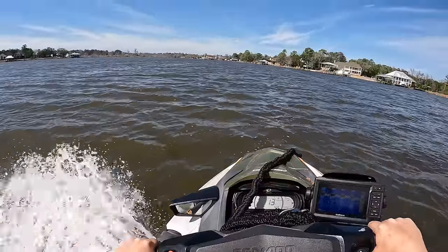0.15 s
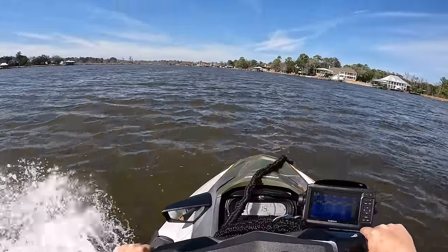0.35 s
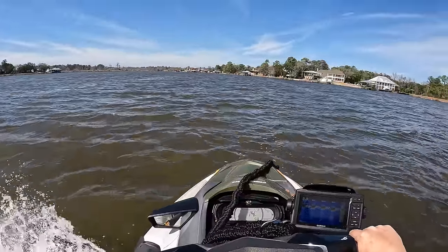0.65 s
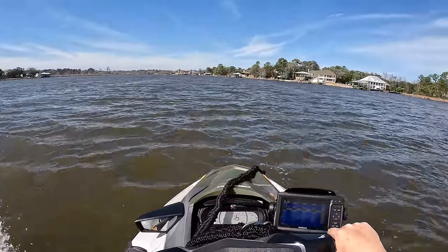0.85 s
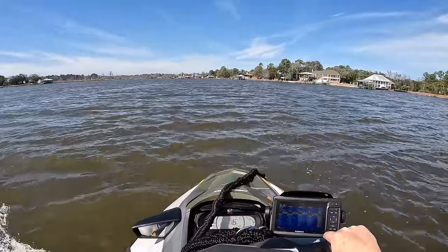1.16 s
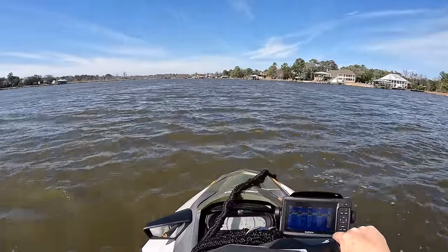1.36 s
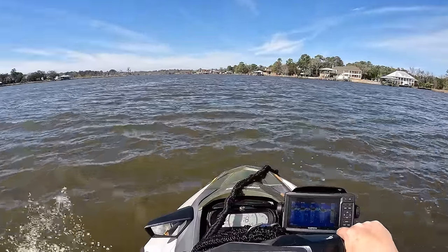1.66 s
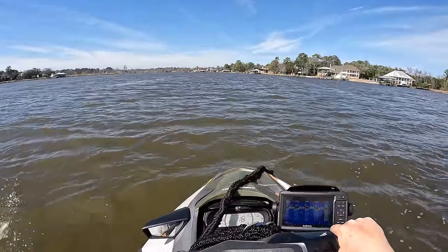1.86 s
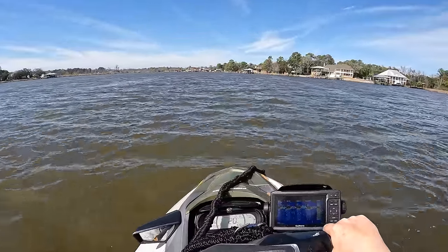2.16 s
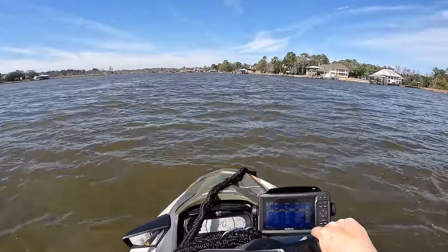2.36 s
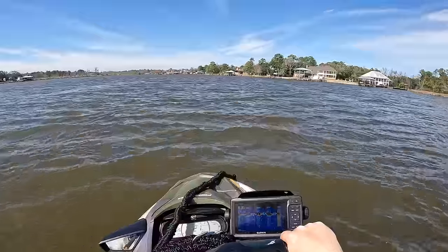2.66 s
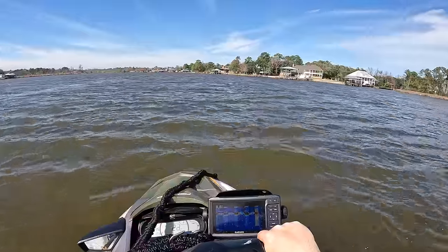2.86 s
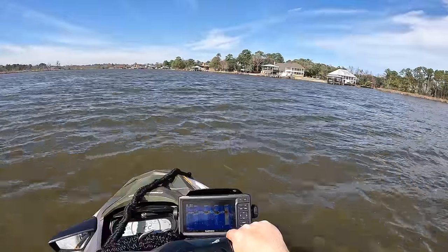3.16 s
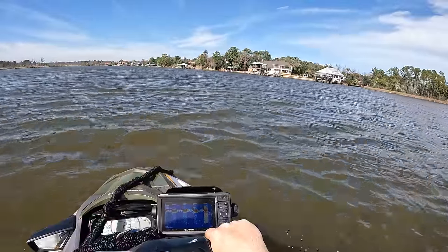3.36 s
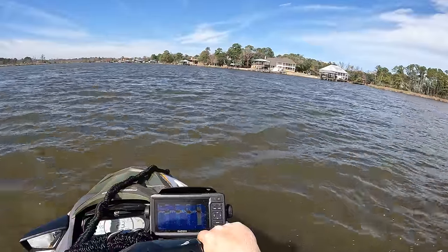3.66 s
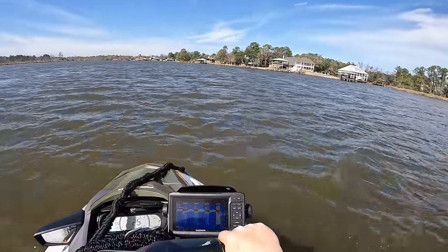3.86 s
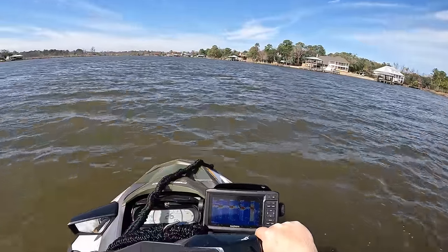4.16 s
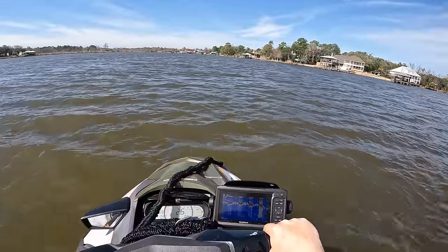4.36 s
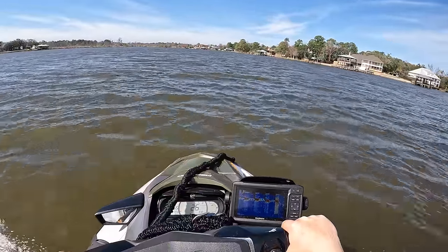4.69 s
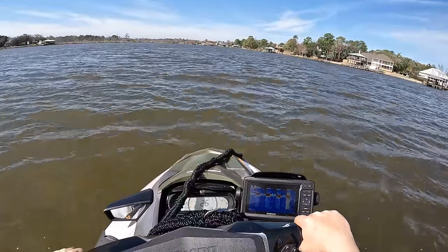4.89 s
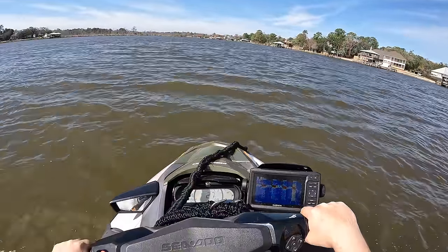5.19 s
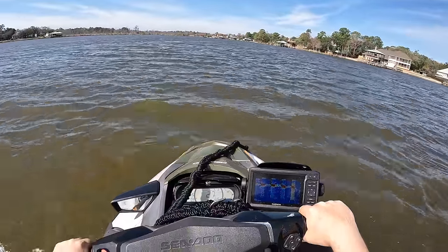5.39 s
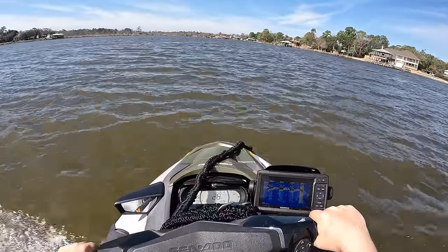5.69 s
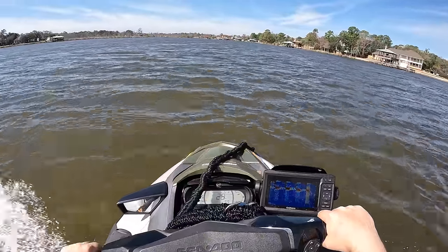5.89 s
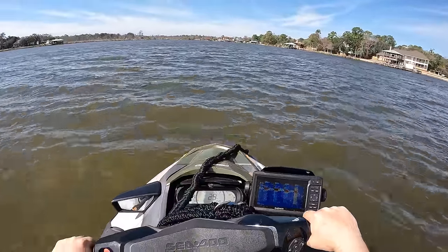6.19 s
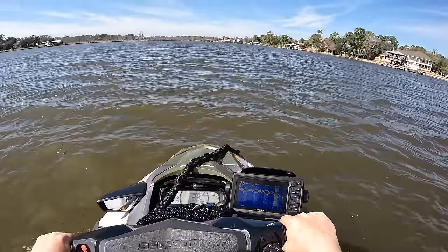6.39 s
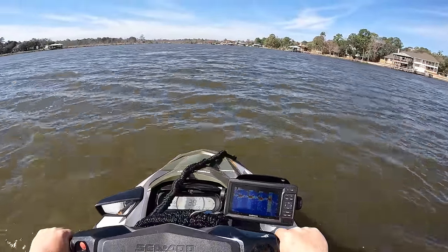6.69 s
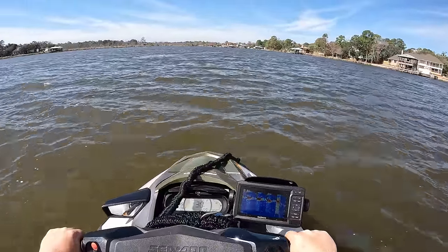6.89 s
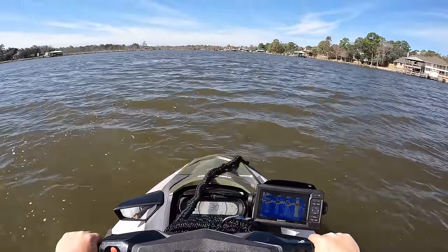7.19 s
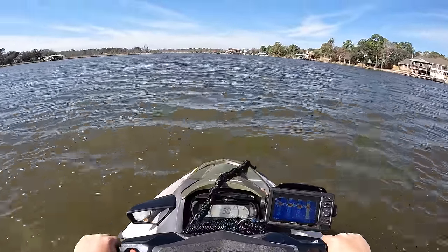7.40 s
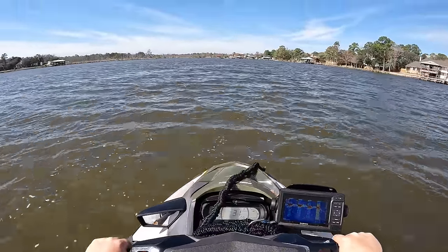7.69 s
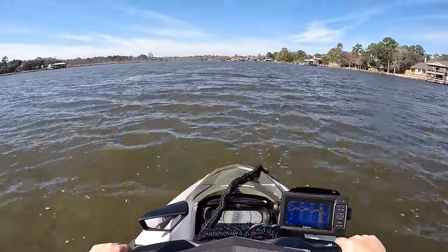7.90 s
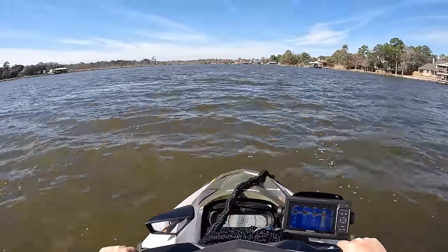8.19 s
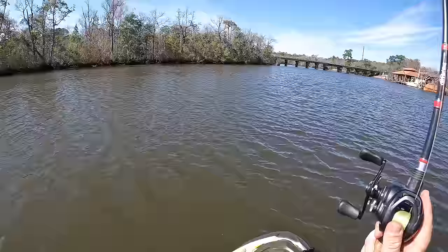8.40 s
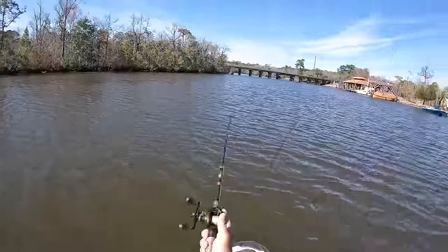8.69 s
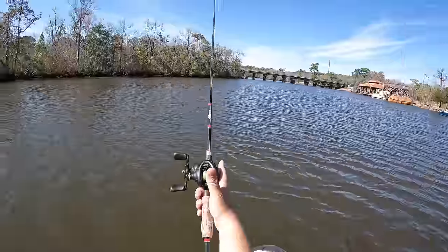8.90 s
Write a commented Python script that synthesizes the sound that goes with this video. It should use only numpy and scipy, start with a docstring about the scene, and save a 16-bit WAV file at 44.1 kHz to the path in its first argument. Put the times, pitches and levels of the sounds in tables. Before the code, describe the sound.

Steady watercraft engine drone with spray, hull slaps and wind rumble, cutting abruptly to a quiet breeze and a brief rod swing.

```python
"""Watercraft on a lake

A three-cylinder four-stroke watercraft cruises, heard from the rider's chest. The engine hums through
the hull, small waves drum on it and wind buffets. Spray hisses, then fades as the craft rises to skim
the water. A sudden cut leads to the craft adrift: a breeze, a rustling sleeve, soft bumps and a
fishing rod swung up."""
import sys
import numpy as np
from scipy import signal
from scipy.fft import rfft, irfft, next_fast_len
from scipy.io import wavfile
from scipy.ndimage import uniform_filter1d

SR = 44100
rng = np.random.default_rng(int(sys.argv[2]) if len(sys.argv) > 2 else 0)


def dump_mix(stems):
    """Bounce the given channels to the path in sys.argv[1] as a 16-bit WAV at rate SR."""
    frames = np.atleast_2d(stems).T  # one column per channel
    limited = np.clip(frames, -1, 1)  # hard clip at full scale
    pcm = np.round(limited * 32767).astype(np.int16)
    wavfile.write(sys.argv[1], SR, pcm)


N = 399100
T = np.arange(N) / SR
CUT_S = 8.4528  # riding ends, drifting begins


def undb(db):
    """Turns decibels into a number to multiply a sound by."""
    return 10 ** (np.asarray(db) / 20)


def curves(table):
    """Joins a table's rows with straight lines: one curve for each column after the time."""
    times, *columns = np.transpose(table)
    return [np.interp(T, times, column) for column in columns]


def wander(rate_hz):
    """A smooth random curve, typically within 1 of zero, with rate_hz new values a second."""
    steps = np.repeat(rng.standard_normal(int(T[-1] * rate_hz) + 2), 16)
    smooth = uniform_filter1d(uniform_filter1d(steps, size=16), size=16)
    return 1.2 * np.interp(T * rate_hz, np.arange(len(steps)) / 16, smooth)


def rush(tone, level_db, flicker_db, rate_hz, grain_db=0):
    """Flickering noise, shaped from bass to treble by a tone table; grain_db adds tiny crackles."""
    noise = rng.standard_normal(N) * undb(grain_db * rng.exponential(size=N))
    size = next_fast_len(N)
    tone_hz, tone_db = np.transpose(tone)
    hz = np.arange(size // 2 + 1) * SR / size + 1
    gains = undb(np.interp(np.log(hz), np.log(tone_hz), tone_db, -99, -99))
    shaped = irfft(rfft(noise, size) * gains, size)[:N]
    shaped /= np.sqrt(np.mean(shaped ** 2))
    return shaped * undb(level_db + flicker_db * wander(rate_hz))


def ploughing(start_s=0.99, end_s=2.96):
    """1 while the hull pushes through the water, easing to 0 as it climbs up and skims."""
    progress = np.clip((T - start_s) / (end_s - start_s), 0, 1)
    return np.cos(np.pi / 2 * progress) ** 2


# Engine speed, where one cycle is two turns of the crank: time_s, cycle_hz
ENGINE_SPEED = [(0, 51.49), (1.4, 51.99), (2.8, 52.83), (3.5, 52.88), (4.7, 53.18), (6.3, 53.35),
                (6.95, 54.02), (8.45, 54.19)]
# Level of the hum's main tone: slow swells, with brief dips as it mixes with water noise:
# time_s, change_db
MAIN_TONE_LEVEL = [(0, 1), (.4, 2.5), (1.2, 4), (1.8, 3), (2.6, -3.5), (3.2, 1), (3.86, 3.5), (4.6, 0),
                   (5.2, -0.5), (5.6, -2.5), (5.95, 0), (6.33, -2.5), (6.8, 4), (7.3, 3), (7.38, -4),
                   (7.46, 2), (7.8, 3.5), (8.1, 0), (8.45, 1)]
# Loud tones of the hum: cycle_multiple, level_db, ploughing_adds_db, change_share, db_per_hz_over_cruise
STRONG_TONES = [(2, -29, 7, -1.1, 0.5), (3, -21, 0.2, 0.98, -0.4), (4, -27, 1, .1, -2.5),
                (6, -20, -6, 0.081, -2.5), (8, -22, -2.5, 0.21, -0.27), (9, -34, -0.5, .8, -4.5),
                (11, -41, 0, 0.54, -6), (15, -45.5, 2, 0.49, -.6), (16, -52, 16.5, .3, 6),
                (20, -53, 3, -0.16, 7.5)]
# Faint tones of the hum: cycle_multiple, level_db, ploughing_adds_db
FAINT_TONES = [(5, -37.5, 2), (7, -43, 8.5), (10, -48.5, -5), (12, -55.5, 18), (13, -58, 2),
               (14, -58.5, 10), (17, -54.5, 12), (18, -54.5, 3), (19, -58.5, 9), (21, -54.5, 7),
               (22, -55, 3), (24, -59, 7.5)]

def engine(cruise_hz=52.8, firings_per_cycle=3):
    """Tones at multiples of the engine cycle waver as the hull flexes. Returns hum and cycle angle."""
    cycle_hz, change_db = curves(ENGINE_SPEED) + curves(MAIN_TONE_LEVEL)
    plough = ploughing()
    over_hz = np.maximum(cycle_hz - cruise_hz, 0)
    tones = [(multiple, db + plough_db * plough + share * change_db + db_per_hz * over_hz)
             for multiple, db, plough_db, share, db_per_hz in STRONG_TONES]
    tones += [(multiple, db + plough_db * plough) for multiple, db, plough_db in FAINT_TONES]
    cycles = np.cumsum(cycle_hz) / SR
    phase = 2 * np.pi * (cycles - cycles[int(CUT_S * SR)]) - .14  # pressure is low at the cut
    hum = np.zeros(N)
    for multiple, db in tones:
        firing = multiple == firings_per_cycle
        # a lopsided suction pulse: odd tones above the firing note swing against it
        offset = .9 + .75 * np.pi * (multiple > firings_per_cycle and multiple % 2)
        # uneven speed blurs high tones more; the firing note gurgles in the wet exhaust
        blur = (.02 * multiple + .12 * firing) * wander(14)
        waver_db = (1 + 1.1 * firing) * wander(7)
        hum -= np.sqrt(2) * undb(db + waver_db) * np.cos(multiple * phase + offset + blur)
    return undb(-.05) * hum, phase


# Tone of water hitting the hull: pitch_hz, level_db
CHOP_TONE = [(70, -19), (110, -3), (150, -0.5), (190, 1.5), (250, -2), (320, -3.5), (385, -5), (440, -5),
             (500, -7.5), (600, -24), (900, -47)]

def chop(level_db):
    """Small choppy waves drum on the hull."""
    return rush(CHOP_TONE, level_db, flicker_db=1.27, rate_hz=12)


# Tone of the churned water behind the craft: pitch_hz, level_db
WAKE_TONE = [(350, -16), (560, -2), (800, -2.5), (1100, -6.5), (1500, -12.5), (2200, -20.5), (4000, -38)]

def wake(phase, added_db):
    """Churned water throbs with the engine cycle, louder while the hull ploughs."""
    throb = 1 + .096 * np.cos(phase) + .07 * np.cos(2 * phase)
    level_db = -34.5 + 6 * ploughing() + added_db
    return throb * rush(WAKE_TONE, level_db, flicker_db=1, rate_hz=15)


# Tone of flying droplets: pitch_hz, level_db
SPRAY_TONE = [(1000, -29.5), (1500, -3), (2200, -3), (3100, -3.5), (5000, -10), (7300, -15.5),
              (8600, -20.5), (10500, -29), (12000, -34.5), (14000, -51.5), (16000, -58.5)]

def spray(level_db):
    """Thrown water hisses, with single droplets standing out."""
    return rush(SPRAY_TONE, level_db, flicker_db=.9, rate_hz=32, grain_db=2)


# Tone of the finest spray: pitch_hz, level_db
MIST_TONE = [(8000, -16), (10000, -2), (11100, -4), (13100, 2), (14000, -2), (15800, -4)]

def mist(fade_start_s=1.45, settle_s=.7, drop_db=35.5):
    """Fine mist gives a very high hiss that dies away as the hull rises."""
    faded = 1 - np.exp(-np.maximum(T - fade_start_s, 0) / settle_s)
    return rush(MIST_TONE, -56.5 - drop_db * faded, flicker_db=.6, rate_hz=25)


# Tone of the headwind: pitch_hz, level_db
WIND_TONE = [(15, -7), (40, -4), (80, -6), (130, -12), (300, -36.5)]

def wind(level_db):
    """Gusts buffet the microphone with a deep rumble."""
    return rush(WIND_TONE, level_db, flicker_db=3, rate_hz=8.3)


# Waves that meet the hull: peak_s, spray_adds_db, wake_adds_db, chop_adds_db, build_up_s
HULL_WAVES = [(.63, 2, 1, -0.5, .15), (1.05, 1, -0.5, 1, 0.073), (1.42, 0, 0, 0.5, 0.088),
              (1.84, 2.5, 1.5, 0.5, 0.15), (2.35, 1.5, 0, 1.5, 0.067), (2.97, 2, -1, 4.5, 0.11),
              (3.14, -1, -1.5, 7.5, .06), (3.56, 2, 1.5, -1, 0.072), (3.93, 1.2, 4, 1.5, 0.24),
              (4.12, 1.5, 3, 0, 0.14), (4.72, 0, 1, 3.5, 0.092), (5.13, 0, -1.5, 6, 0.053),
              (5.7, 0, 2.5, 2, 0.088), (6.27, 0.5, 3, 3, 0.14), (6.8, -0.5, 2, -1, 0.056),
              (7.42, 1.5, 0.5, 6, 0.066), (7.75, 0.5, 2.5, 1, 0.12), (8.24, 1.5, 2, -3, 0.057)]

def waves(break_s=.05):
    """Each wave builds up, then breaks off. Returns the decibels added to spray, wake and chop."""
    peak_s, *added_db, build_up_s = np.transpose(HULL_WAVES)[:, :, None]
    width_s = np.where(T < peak_s, build_up_s, break_s)
    shape = np.exp(-((T - peak_s) / width_s) ** 2)
    return [np.sum(db * shape, axis=0) for db in added_db]


# Loudness of air and water during the ride: time_s, wind_db, chop_db, spray_db
RIDE_LEVELS = [(0, -27.5, -23, -38), (.6, -23, -23, -37.5), (1.0, -31.5, -21.5, -38),
               (1.5, -29.5, -20, -39), (2.25, -30, -23.5, -39.5), (2.75, -27.5, -24, -40.5),
               (3.3, -35, -26, -42), (3.7, -26, -23.5, -42.5), (4.3, -31, -25, -45),
               (5.1, -29.5, -23, -45.5), (5.5, -26.5, -23, -45), (6.1, -29, -24, -43.5),
               (6.7, -26.5, -25, -47.5), (7.15, -31, -24, -46.5), (7.45, -26, -24.5, -47),
               (7.88, -34, -22.5, -46.5), (8.12, -24, -20.5, -48), (8.45, -29, -20.5, -47.5)]

def riding():
    """Engine, water and wind together while the craft moves."""
    wind_db, chop_db, spray_db = curves(RIDE_LEVELS)
    splash_db, churn_db, slap_db = waves()
    hum, phase = engine()
    surge = wander(16)  # wake and spray rise and fall together
    water = chop(chop_db + slap_db)
    water += wake(phase, churn_db + .5 * surge)
    water += spray(spray_db + splash_db + .46 * surge)
    return hum + water + mist() + wind(wind_db)


# Tone of light wind: pitch_hz, level_db
BREEZE_TONE = [(12, -2), (30, 2.5), (60, -12.5), (120, -12), (220, -16), (350, -37), (600, -55)]

def breeze(level_db):
    """A breeze rumbles softly on the microphone."""
    return rush(BREEZE_TONE, level_db, flicker_db=2, rate_hz=31)


# Tones of the sleeve's low rustle and fine hiss: pitch_hz, level_db
RUSTLE_TONE = [(250, -4.5), (450, -15), (1200, -20.5), (1700, -34)]
CLOTH_HISS_TONE = [(4500, -22), (6500, -7), (7500, -4), (8600, -8), (10500, -15), (13000, -35)]

def sleeve(rustle_db, swing):
    """Cloth rubs as the arm moves; its high hiss needs a fast swing."""
    rustle = rush(RUSTLE_TONE, rustle_db, flicker_db=.5, rate_hz=59, grain_db=2.5)
    hiss = rush(CLOTH_HISS_TONE, -71 + 16 * swing ** 1.7, flicker_db=3, rate_hz=50)
    return rustle + hiss


# Tones of the rod's swish and the thin hiss above it: pitch_hz, level_db
SWISH_TONE = [(800, -8), (1300, 4.5), (2300, 4.5), (3300, 1), (4500, -6.5), (6500, -13)]
AIR_HISS_TONE = [(9000, -15), (11000, -2), (12800, -4), (14500, -12), (15800, -25)]

def fishing_rod(swing):
    """The rod cuts the air, louder the faster it swings."""
    swish = rush(SWISH_TONE, -66.5 + 27 * swing, flicker_db=-2.5, rate_hz=60, grain_db=1.5)
    hiss = rush(AIR_HISS_TONE, -85 + 25 * swing ** 1.7, flicker_db=3, rate_hz=60)
    return swish + hiss


# Scrapes of rod, reel and sleeve: peak_s, level_db, pitch_hz, width_hz, half_length_s
GEAR_SCRAPES = [(8.508, -53, 1050, 300, .006), (8.525, -55, 1300, 350, .006), (8.672, -54, 1100, 400, .005),
                (8.742, -43.5, 2490, 1300, 0.01), (8.796, -44, 1100, 1200, 0.012),
                (8.818, -42, 2100, 1200, .012), (8.833, -39, 2600, 1600, 0.0055),
                (8.837, -39, 1600, 900, .006), (8.839, -42, 7440, 1200, 0.003),
                (8.883, -43, 2100, 1400, .012), (8.916, -47, 1550, 200, .02)]

def scrapes():
    """Rubbing makes short bursts of noise, each swelling and fading around one pitch."""
    out = np.zeros(N)
    for peak_s, level_db, pitch_hz, width_hz, half_s in GEAR_SCRAPES:
        t = T[int((peak_s - 4 * half_s) * SR):int((peak_s + 4 * half_s) * SR)]
        edges_hz = [pitch_hz - width_hz / 2, pitch_hz + width_hz / 2]
        band = signal.butter(2, edges_hz, "bandpass", fs=SR, output="sos")
        burst = signal.sosfilt(band, rng.standard_normal(len(t))) * np.sqrt(SR / 2 / width_hz)
        shape = np.exp(-((t - peak_s) / half_s) ** 2)
        start = round(t[0] * SR)
        out[start:start + len(t)] += undb(level_db) * burst * shape
    return out


# Soft knocks of the arm: peak_s, level_db, half_length_s
ARM_BUMPS = [(8.833, -20.5, 0.0025), (8.863, -24, 0.0037), (8.889, -18, 0.0065), (8.7, -25, 0.0044),
             (8.941, -25, .003)]

def bumps():
    """The arm nudges the microphone; each push is one dull pulse."""
    return sum(-undb(level_db) * np.exp(-((T - peak_s) / half_s) ** 2)
               for peak_s, level_db, half_s in ARM_BUMPS)


# Air and arm movement while adrift: time_s, breeze_db, rustle_db, swing_0_to_1
DRIFT_LEVELS = [(8.46, -41, -53, .02), (8.54, -29, -54, 0.22), (8.6, -34.5, -55, .08),
                (8.67, -27.5, -57, 0.16), (8.72, -31, -53, 0.43), (8.77, -30, -46, .55),
                (8.83, -28.5, -41, 1.0), (8.89, -31, -45, 0.62), (8.95, -31.5, -45, 0.6),
                (9.05, -33, -45, 0.56)]

def adrift():
    """With the engine silent, the rider swings a fishing rod up in the breeze."""
    breeze_db, rustle_db, swing = curves(DRIFT_LEVELS)
    return breeze(breeze_db) + sleeve(rustle_db, swing) + fishing_rod(swing) + scrapes() + bumps()


def scene():
    """Riding until the cut, drifting after it, in one channel."""
    return np.where(T < CUT_S, riding(), adrift())[None]


def record(dry, top_hz=15800):
    """Rounds off the loudest peaks and removes the highest treble."""
    rounded = np.tanh(1.15 * dry) / 1.062
    treble_cut = signal.ellip(8, .2, 70, top_hz, fs=SR, output="sos")
    return signal.sosfilt(treble_cut, rounded)


dry = scene()
out = record(dry)
dump_mix(out)
```